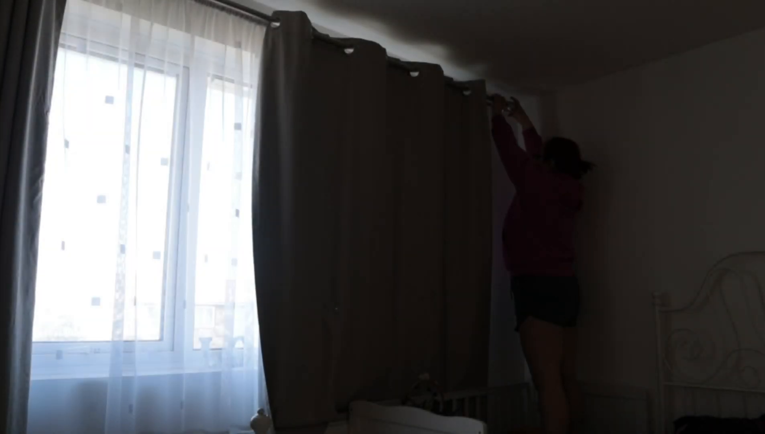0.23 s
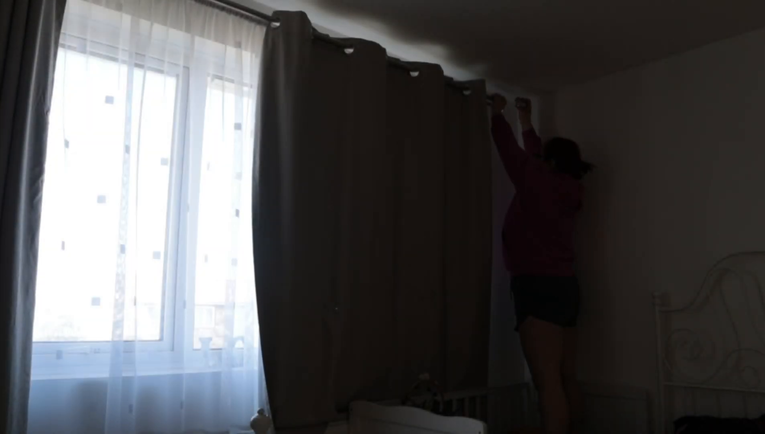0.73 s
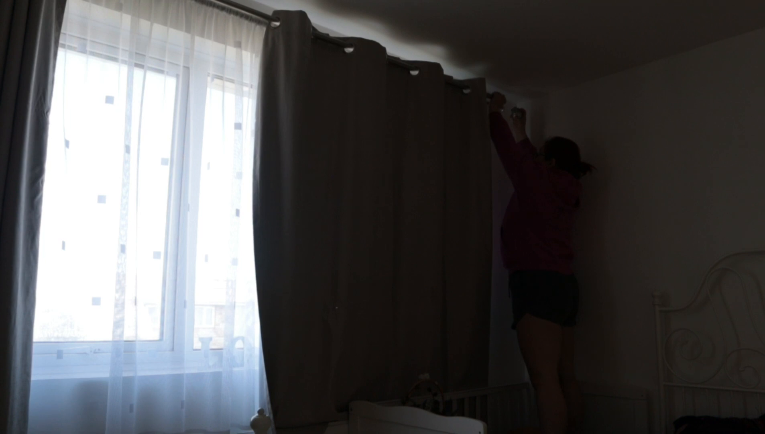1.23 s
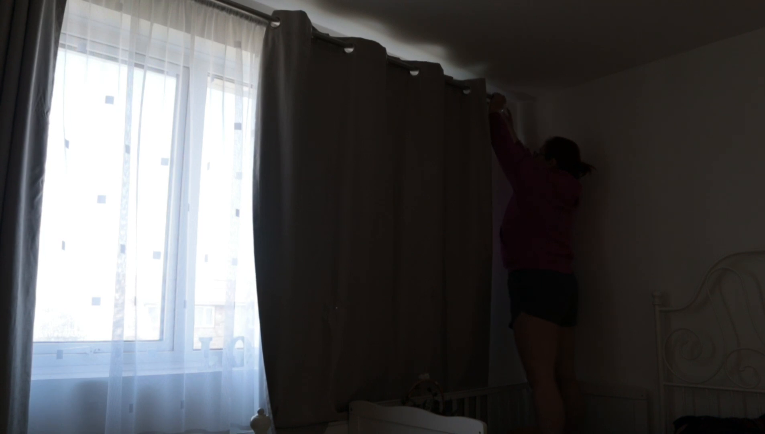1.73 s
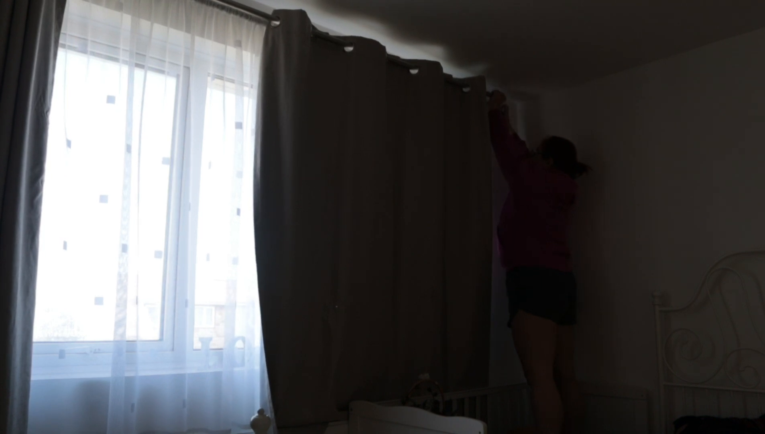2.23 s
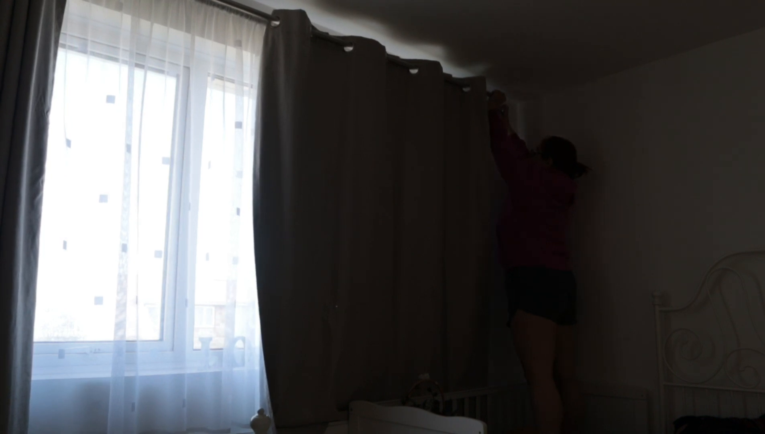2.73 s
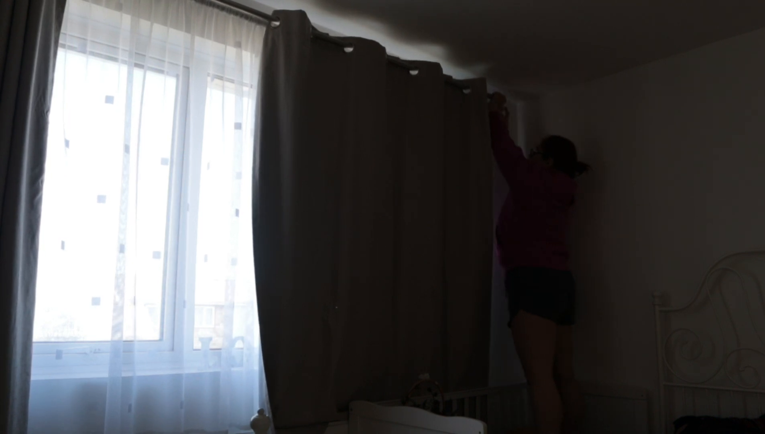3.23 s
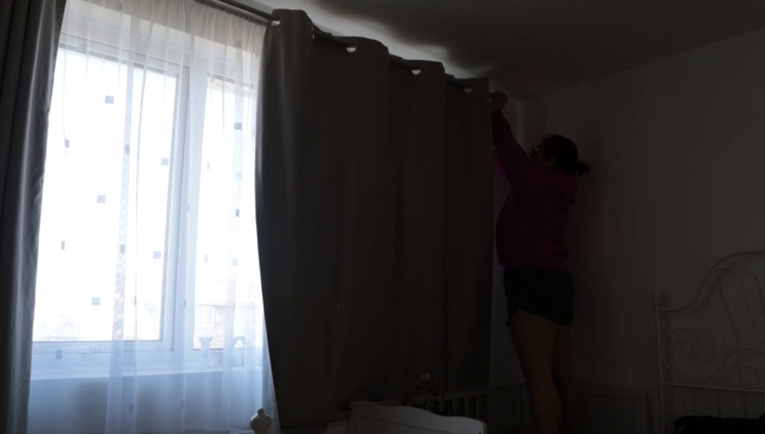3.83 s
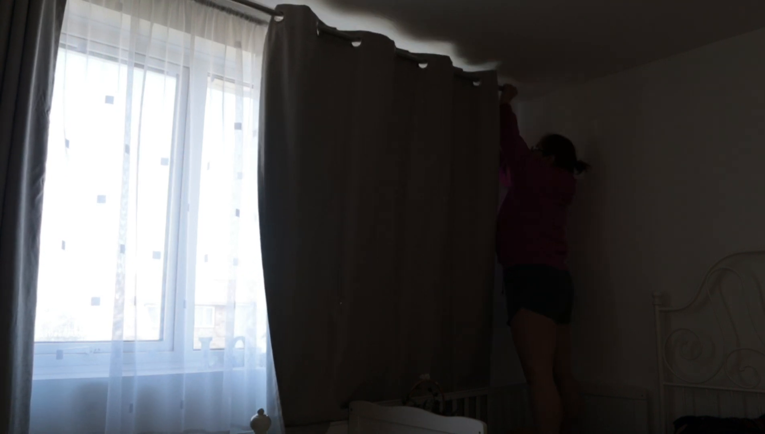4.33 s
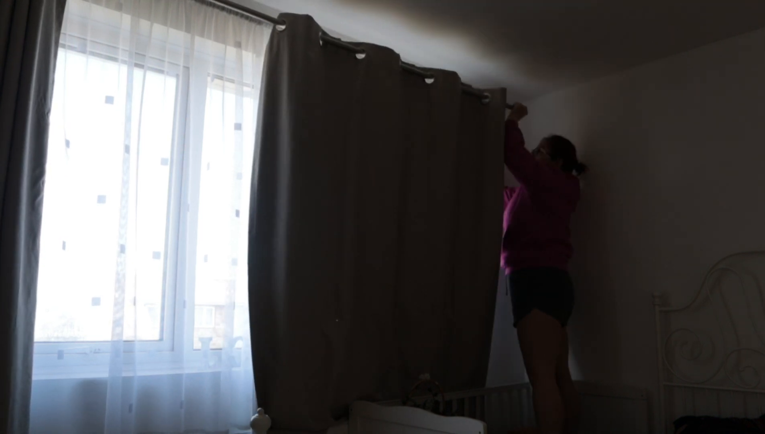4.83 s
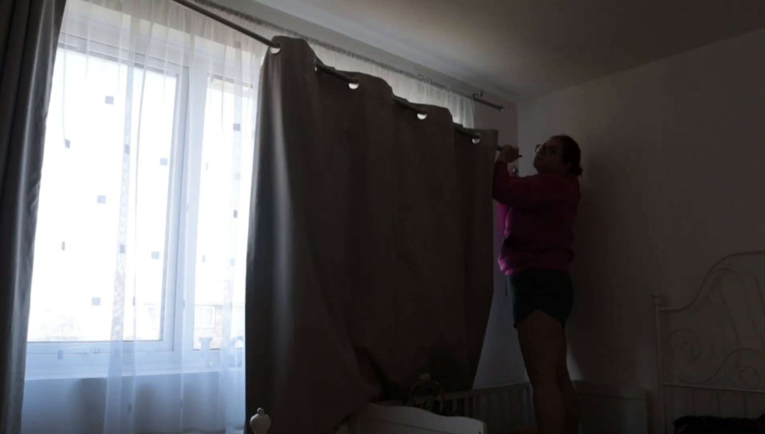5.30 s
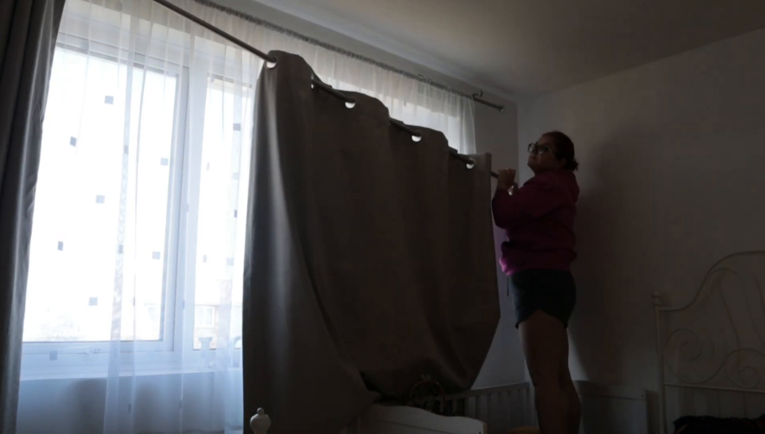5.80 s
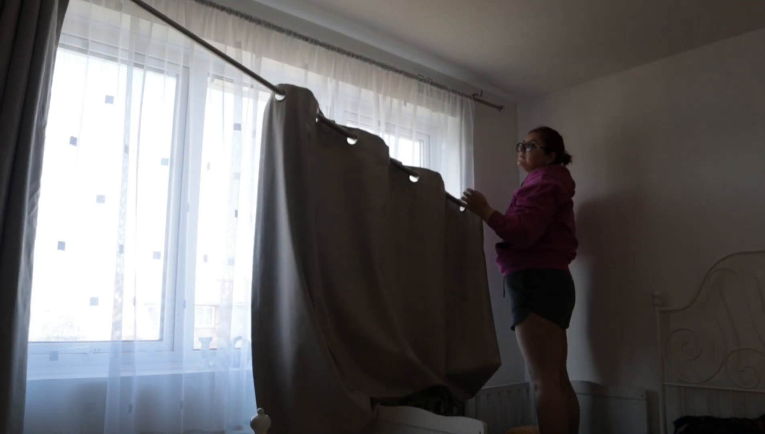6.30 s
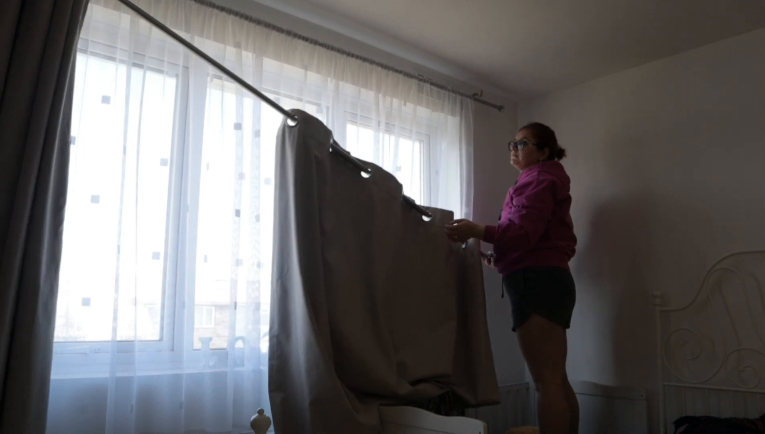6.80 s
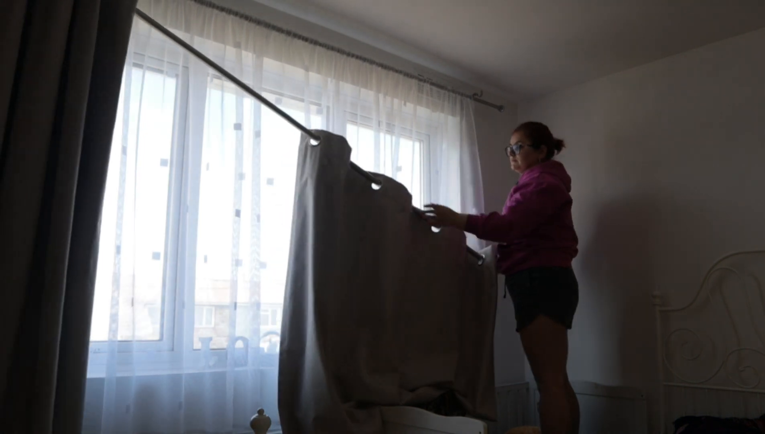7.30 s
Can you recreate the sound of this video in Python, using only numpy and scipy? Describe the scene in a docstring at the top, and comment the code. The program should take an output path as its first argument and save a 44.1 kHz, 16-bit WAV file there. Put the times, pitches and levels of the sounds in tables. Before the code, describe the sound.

A quiet furnished bedroom is heard in wide stereo from across the room, with a short echo and faint low motors passing outside. From about 0.2 to 1.2 seconds a metal curtain pole gives a few light, hollow knocks and dull bumps against its brackets and the wall. At 2.3 seconds comes one sharp clack, by far the loudest sound, with a brief rattle of rings. Soft bumps follow, then a cluster of knocks and short tugs at heavy cloth from 3.2 to 4.2 seconds, strongest at 3.5. From 4.4 to 6 seconds the curtain rustles softly as it sways, and a motor drone swells slightly near 4.8. From 6 seconds to the end, at about 7.5, metal rings scrape unevenly down the tube, growing louder, with a run of sharp clinks and knocks and dull thumps near 6.6 and 7.3.

```python
"""Taking down a curtain pole

A metal pole is worked out of its brackets in a furnished bedroom and lowered at one end.
Its knocks ring the tube and thud into the wall; heavy cloth rustles and sways, then the eyelet
rings stick and slip down the tube. Motors drone past outside.
A stereo microphone with a wide treble stands across the room."""
import sys
import numpy as np
from scipy import signal
from scipy.fft import rfft, irfft, next_fast_len
from scipy.io import wavfile

SR = 44100
rng = np.random.default_rng(int(sys.argv[2]) if len(sys.argv) > 2 else 0)


def int16_out(signal):
    """Quantize to a 16-bit WAV file."""
    q = np.round(np.clip(np.atleast_2d(signal).T, -1, 1) * 32767)
    wavfile.write(sys.argv[1], SR, q.astype(np.int16))


N = 332955
FFT_SIZE = next_fast_len(N + SR // 2, real=True)

# passing motors: (start [s], loudest [s], end [s], first pitch [Hz], last pitch [Hz], peak [dB])
MOTOR_PASSES = [(-0.5, -0.3, 0.3, 72, 67, -47), (1.0, 1.85, 2.1, 30, 51, -52),
                (2.6, 4.8, 5.25, 51, 65.5, -39.5), (3.9, 5.4, 6.2, 52, 35, -47.5),
                (6.7, 7.25, 7.5, 44, 41, -49)]
# colour of the quiet room: (frequency [Hz], level [dB])
ROOM_TONE_EQ = [(35, -46), (60, -3.5), (118, -3), (161, 0), (347, -10.5), (486, -12.5), (1170, -17),
                (10100, -36), (13000, -43)]
# pole and ring hits: (time [s], level [dB], hollow mids [dB re level], treble [dB re level],
# low body [dB re level])
KNOCK_CUES = [(0.2054, -41.5, -1, -16, 9), (0.2268, -30.5, -14, -10.5, 2), (0.5608, -40.5, 5, -13, 11),
              (0.5763, -35, -14, -13, 3), (0.615, -24, -14, -5.5, -12), (1.1652, -32, -15, -16, 4.5),
              (1.5192, -46.5, -6, -11, -7), (2.0514, -45.5, 13, -12.5, 17.5),
              (2.2718, -2.5, -8.5, -6.5, -9), (2.6342, -43, -7, -15, 8), (3.217, -38, -28, -17, -0.5),
              (3.264, -34, -4, -13, 0), (3.3487, -52.5, -11, 6, -3), (3.4238, -35, -12, -14, 1),
              (3.4867, -18, -7, -5, -16), (3.597, -38, -3, -12, 5), (4.21, -36.5, -6, -12, 3),
              (5.465, -41, -8, -12, -5), (5.9233, -33, -6, -18, -20), (5.957, -29, -1, -14, -12),
              (6.3885, -18.5, -9.5, -7.5, -10), (6.7208, -19.5, -9.5, -12, -22),
              (6.8345, -20.5, -12, -7, -24), (6.997, -30, -2, -12, -20), (7.0444, -29, -4, -6.5, -33),
              (7.1682, -21.5, -6, -7, -14), (7.3091, -16, -1.5, -11, -5.5), (7.486, -24.5, -11.5, -8.5, -7)]
# dull bumps on bracket and floor: (time [s], level [dB], decay [ms])
THUMP_CUES = [(0.235, -30.5, 38), (0.36, -43, 60), (0.578, -28.5, 34), (0.988, -38, 16), (1.18, -39, 28),
              (2.502, -36, 30), (2.652, -35, 22), (2.801, -43, 38), (3.253, -29, 30), (3.505, -26.5, 25),
              (3.597, -32, 18), (3.764, -34.5, 26), (4.09, -39, 30), (4.135, -33, 38), (4.199, -35.5, 30),
              (5.101, -36, 24), (5.693, -34.5, 30), (6.56, -17.5, 16), (7.328, -25.5, 36)]
# modes of the metal tube: (frequency [Hz], base width [Hz], level [dB])
TUBE_MODES = [(830, 180, 0.), (1080, 90, -3), (1770, 80, -6), (2230, 120, -4), (2830, 80, -5),
              (3460, 80, -6), (4120, 70, -8), (5640, 150, -11)]
# modes of the small metal rings: (frequency [Hz], base width [Hz], level [dB])
EYELET_MODES = [(7760, 140, -7), (8800, 140, -7), (10650, 260, -2), (9800, 100, -3)]
# modes of bracket and wall: (frequency [Hz], base width [Hz], level [dB])
WALL_MODES = [(165, 39, -3.5), (231, 35, 0), (327, 15, 2.5), (430, 40, -5.5), (584, 107, -17)]
# short tugs at the cloth: (start [s], swell [s], hold [s], rustle [dB], hiss [dB re rustle])
CLOTH_TUGS = [(0.56, 0.03, 0.04, -42, -16), (2.055, 0.02, 0.18, -50.5, -15), (2.92, 0.09, 0.04, -55, -0.5),
              (3.215, 0.02, 0.03, -49, -9), (3.262, 0.01, 0.03, -41, -12), (3.33, 0.02, 0.04, -62, 10),
              (3.42, 0.02, 0.05, -47, -7), (3.49, 0.02, 0.045, -35.5, -8), (3.6, 0.02, 0.2, -49, -5),
              (4.02, 0.13, 0.08, -44, -6), (4.25, 0.03, 0.07, -52, 0)]
# the cloth sways as the pole comes down: (time [s], rustle [dB], hiss [dB re rustle])
CLOTH_SWAY = [(4.4, -59, 1), (4.55, -50, 0), (4.92, -53.5, 2), (5.02, -48, 1), (5.2, -50, 2),
              (5.45, -47.5, -2), (5.65, -52, 0), (5.82, -57, 1), (5.94, -51, -5)]
# dull side of the cloth: (frequency [Hz], level [dB])
RUSTLE_EQ = [(180, -12), (300, 3), (334, 4.5), (437, -3), (951, -2), (5000, -19), (6500, -36),
             (11000, -120)]
# bright hiss of cloth and rings: (frequency [Hz], level [dB])
HISS_EQ = [(1760, -1), (3000, -4.5), (3330, -3.5), (6580, -5.5), (10300, -4.5), (11400, -6.5), (13000, -16)]
# rings rattle after the loudest knock: (start [s], swell [s], hold [s], rub [dB], hiss [dB re rub])
RING_RATTLE = (2.275, 0.03, 0.09, -29.5, -2)
# rings run down the tube: (time [s], rub [dB], hiss [dB re rub])
RING_SLIDE = [(5.98, -43.5, -9), (6.12, -44.5, -10), (6.24, -37.5, -6), (6.37, -34, -3.5), (6.42, -32, -5),
              (6.55, -34.5, -3), (6.7, -33, -5), (6.76, -31, -4), (6.9, -31.5, -5.5), (6.97, -39, -6),
              (7.02, -34.5, -6), (7.14, -30.5, -5.5), (7.23, -28.5, -4.5), (7.33, -30.5, -6),
              (7.45, -38, -3), (7.55, -35.5, -4)]
# broad colour of rings rubbing: (frequency [Hz], level [dB])
RUB_EQ = [(88, -75), (150, 1.5), (231, -3.5), (557, -1), (819, -3), (1250, -3), (1550, -8), (2230, 3),
          (6000, -43), (7800, -46), (13200, -120)]
# bedroom reverb: (frequency [Hz], time to fall 60 dB [s])
ROOM_DECAY = [(100, 0.49), (500, 0.54), (2000, 0.37), (6000, 0.34), (12000, 0.11)]
# stereo width: (frequency [Hz], side gain [dB])
SIDE_EQ = [(60, -15), (170, -19), (300, -3.5), (520, -8), (930, -1.5), (2000, 4.5), (5760, 4.5),
           (14300, 6.5)]


def from_db(db):
    """Decibels to gain."""
    return 10 ** (np.asarray(db) / 20)


def rms_one(x):
    """Normalise to rms 1."""
    return x / np.sqrt(np.mean(x ** 2) + 1e-20)


def automation(rows):
    """One curve for each column after the time column."""
    times, *columns = np.transpose(rows)
    return [np.interp(np.arange(N) / SR, times, column) for column in columns]


def at_hz(points, hz):
    """Read a (frequency [Hz], value) table on a log-frequency axis."""
    frequencies, values = np.transpose(points)
    return np.interp(np.log(hz + 1), np.log(frequencies), values)


def eq(x, curve):
    """Colour x with a (frequency [Hz], level [dB]) curve."""
    gain = from_db(at_hz(curve, np.fft.rfftfreq(FFT_SIZE, 1 / SR)))
    return irfft(rfft(x, FFT_SIZE) * gain, FFT_SIZE)[..., :N]


def band(x, low_hz, high_hz):
    """Gentle band-pass."""
    return signal.sosfilt(signal.butter(2, [low_hz, high_hz], "band", fs=SR, output="sos"), x)


def drift(rate_hz, knots_per_s=60):
    """Slow random wobble, rms about 1."""
    knots = rng.standard_normal(int(N / SR * knots_per_s) + 2)
    r = np.exp(-2 * np.pi * rate_hz / knots_per_s)
    wobble = rms_one(signal.lfilter([1], [1, -r], knots))
    return np.interp(np.arange(N) / SR * knots_per_s, np.arange(len(knots)), wobble)


def resonances(x, modes, widen):
    """Parallel resonators of alternating polarity; widening them shortens the ring."""
    out = 0
    for k, (hz, width, level_db) in enumerate(modes):
        r = np.exp(-np.pi * width * widen / SR)
        feedback = [1, -2 * r * np.cos(2 * np.pi * hz / SR), r * r]
        ringing = signal.lfilter([(1 - r * r) / 2, 0, (r * r - 1) / 2], feedback, x)
        out = out + (-1) ** k * from_db(level_db) * ringing
    return out


def bursts(times, levels_db, decays_ms, rise):
    """Envelope of hits whose attack lasts a share, rise, of their decay time."""
    out = np.zeros(N)
    for s, level_db, ms in zip(times, levels_db, decays_ms):
        start = round(s * SR)
        age = np.arange(min(N - start, SR // 2)) / SR / (ms / 1000)
        out[start:start + len(age)] += from_db(level_db) * (1 - np.exp(-age / rise)) * np.exp(-age)
    return out


def grains(per_s, spread_db):
    """Tiny contacts of uneven size; mid and side get unrelated ones, so the texture is wide."""
    sizes = from_db(spread_db * np.minimum(rng.exponential(1, (2, N)), 4))
    signs = rng.choice([-1, 1], (2, N))
    hits = rng.random((2, N)) < per_s / SR
    return rms_one(sizes * signs * hits + 1e-9)


def linger(gain, t60_s, share=0.17):
    """A share of an envelope's power hangs on in the room."""
    r = from_db(-120 / (t60_s * SR))
    tail_power = signal.lfilter([1 - r], [1, -r], gain ** 2)
    return np.sqrt((1 - share) * gain ** 2 + share * tail_power)


def movement(long_move, gestures, fade_s=0.04, release_db_per_s=320):
    """Body and hiss envelopes of one long move plus short gestures that swell, hold and die."""
    t = np.arange(N) / SR
    level_db, hiss_db = automation(long_move)
    fade_in = np.clip((t - long_move[0][0]) / fade_s + 1, 0, 1)
    fade_out = np.clip((long_move[-1][0] - t) / fade_s + 1, 0, 1)
    body, hiss = fade_in * fade_out * from_db([level_db, level_db + hiss_db])
    for start, swell_s, hold_s, level_db, hiss_db in gestures:
        release_db = release_db_per_s * np.maximum(t - start - swell_s - hold_s, 0)
        gain = np.clip((t - start) / swell_s, 0, 1) ** 2 * from_db(level_db - release_db)
        body += gain
        hiss += gain * from_db(hiss_db)
    return linger(body, t60_s=0.49), linger(hiss, t60_s=0.43)


def traffic(fade_s=0.15, slope_db_per_s=8, rumble_db=-56):
    """Firing tones of passing motors glide, swell and fade over a wavering low rumble."""
    t, tones = np.arange(N) / SR, 0
    for start, loudest, end, first_hz, last_hz, peak_db in MOTOR_PASSES:
        gate = np.clip((t - start) / fade_s, 0, 1) * np.clip((end - t) / fade_s + 1, 0, 1)
        level_db = peak_db - slope_db_per_s * np.abs(t - loudest) + 0.6 * drift(4)
        hz, = automation([(start, first_hz), (end, last_hz)])
        firing = np.sqrt(2) * np.sin(2 * np.pi * np.cumsum(hz) / SR)
        tones = tones + gate * from_db(level_db) * firing
    rumble = rms_one(band(rng.standard_normal(N + SR), 30, 85)[SR:])
    return tones + from_db(rumble_db + 1.5 * drift(1.5)) * rumble


def room_tone(level_db=-50.5):
    """A steady bed of dark air, a little stronger in the side channel."""
    air = rms_one(eq(rng.standard_normal((2, N)), ROOM_TONE_EQ))
    return from_db(level_db) * air * from_db([[0], [1.5]])


def knocks(chatter_ms=6.5):
    """Each hit cracks, rings the tube and the eyelets, and thuds into bracket and wall."""
    times, level_db, hollow_db, treble_db, body_db = np.transpose(KNOCK_CUES)
    click_samples = np.round(times * SR).astype(int) + 60
    noise = rng.standard_normal(N)

    def contact(drive_db):
        """A click inside a short burst of chatter."""
        envelope = bursts(times - 0.001, drive_db, np.full(len(times), chatter_ms), rise=0.37)
        strike = from_db(-8) * envelope * noise
        strike[click_samples] += from_db(drive_db + 5)
        return strike

    hollow = from_db(10) * band(contact(level_db + hollow_db), 477, 1480)
    crack = hollow + from_db(1.5) * band(contact(level_db), 1400, 2900)
    tube = from_db(2) * resonances(crack, TUBE_MODES, widen=7.4)
    tick = band(contact(level_db + treble_db), 5400, 13000)
    chink = from_db(8) * resonances(tick, EYELET_MODES, widen=0.55)
    wall = resonances(contact(level_db + body_db), WALL_MODES, widen=1.74)
    thud = band(band(wall, 172, 780), 140, 1500)
    return from_db(11.5) * (crack + tube + tick + chink) + from_db(30) * thud


def thumps():
    """Soft, slow pushes stir the low modes of bracket and wall."""
    times, level_db, decay_ms = np.transpose(THUMP_CUES)
    push = bursts(times - 0.005, level_db, decay_ms, rise=0.23) * rng.standard_normal(N)
    return from_db(19.5) * resonances(push, WALL_MODES, widen=1.03)


def cloth(fibres):
    """Fibres brush as the curtain is tugged and sways: a dull rustle with hiss on top."""
    rustle_gain, hiss_gain = movement(CLOTH_SWAY, CLOTH_TUGS)
    return rustle_gain * rms_one(eq(fibres, RUSTLE_EQ)) + hiss_gain * rms_one(eq(fibres, HISS_EQ))


def eyelet_rings(fibres):
    """Rings stick and slip on the tube in dense contacts, and lend the hiss a metallic sheen."""
    rub_gain, sheen_gain = movement(RING_SLIDE, [RING_RATTLE])
    slips = grains(per_s=6000, spread_db=3.5) * from_db(1.6 * drift(14))
    tube = rms_one(resonances(slips, TUBE_MODES, widen=1))
    scrape = from_db(2) * rms_one(eq(slips, RUB_EQ))
    hiss = rms_one(eq(fibres, HISS_EQ))
    sheen = hiss + from_db(-1.5) * resonances(hiss, EYELET_MODES, widen=0.65)
    return rub_gain * rms_one(tube + scrape) + sheen_gain * rms_one(sheen)


def bedroom(x, wet_db, side_direct_db):
    """Mid and side each get the direct sound plus a diffuse tail that dies octave by octave."""
    t, tails = np.arange(SR // 2) / SR, 0
    edges_hz = np.minimum(80 * 2 ** np.arange(9), 18000)
    white = rng.standard_normal((2, len(t)))
    for low, high in zip(edges_hz, edges_hz[1:]):
        t60_s = at_hz(ROOM_DECAY, np.sqrt(low * high))
        tails = tails + band(white, low, high) * from_db(-60 * t / t60_s)
    tails *= 1 + 4.5 * np.exp(-t / 0.027)   # near walls and the window answer strongest
    tails *= np.clip(t / 0.0011, 0, 1)   # reflections fade in behind the direct sound
    response = from_db(wet_db) * tails / np.sqrt(np.sum(tails ** 2, axis=1, keepdims=True))
    response[0, 0] = 1
    response[1, 9] = from_db(side_direct_db)   # reaches the side 9 samples later
    return irfft(rfft(x, FFT_SIZE) * rfft(response, FFT_SIZE), FFT_SIZE)[:, :N]


def scene():
    """Mix in mid and side: the room's sounds widen towards the treble, traffic sits in the centre."""
    hits = bedroom(knocks() + thumps(), wet_db=2.5, side_direct_db=-13) * from_db([[0], [-0.7]])
    fibres = grains(per_s=12000, spread_db=-1) * from_db(1.12 * drift(7))
    mid, side = hits + cloth(fibres) + eyelet_rings(fibres) + room_tone()
    side = eq(side + 0.14 * mid, SIDE_EQ)   # the image leans a little left
    mid = mid + traffic()
    return np.array([mid + side, mid - side])


def record(dry):
    """The treble rolls off above 11.8 kHz, peaks clip at full scale, a steep filter cuts the top."""
    dull = signal.sosfilt(signal.butter(6, 11800, fs=SR, output="sos"), dry)
    top_cut = signal.cheby2(12, 70, 14950, fs=SR, output="sos")
    return signal.sosfilt(top_cut, np.clip(dull, -1, 1))


dry = scene()
out = record(dry)
int16_out(out)
```